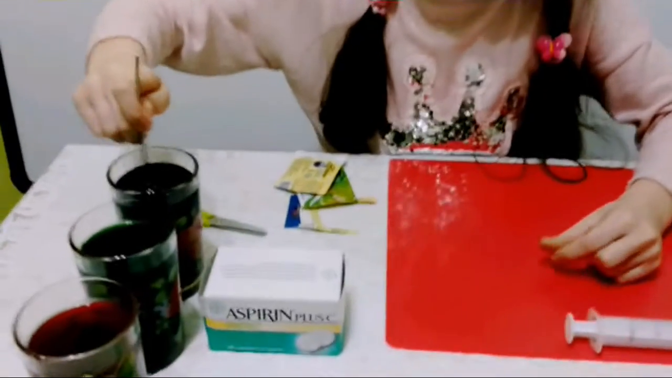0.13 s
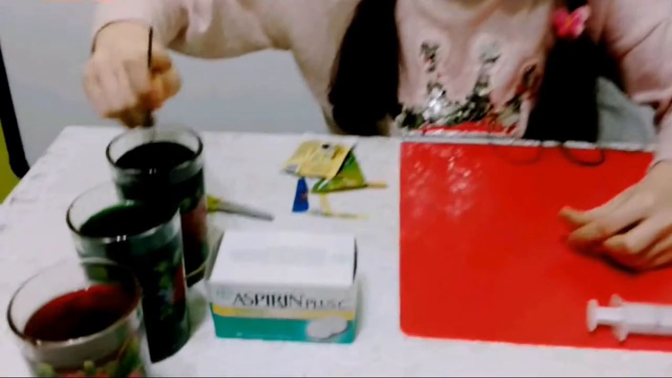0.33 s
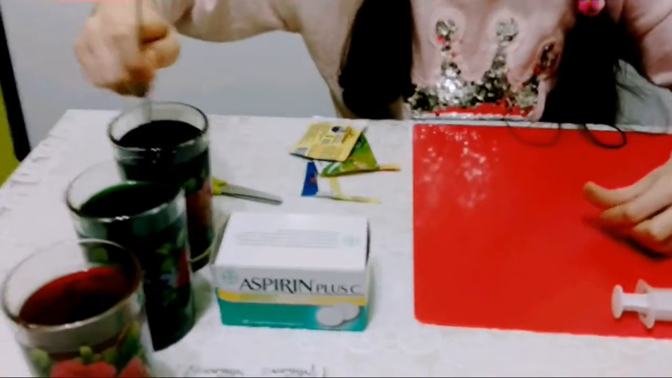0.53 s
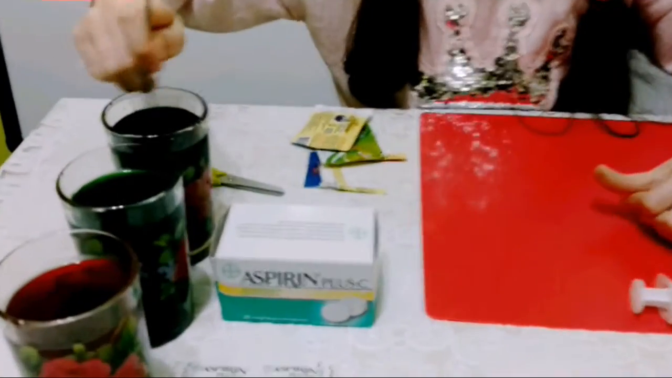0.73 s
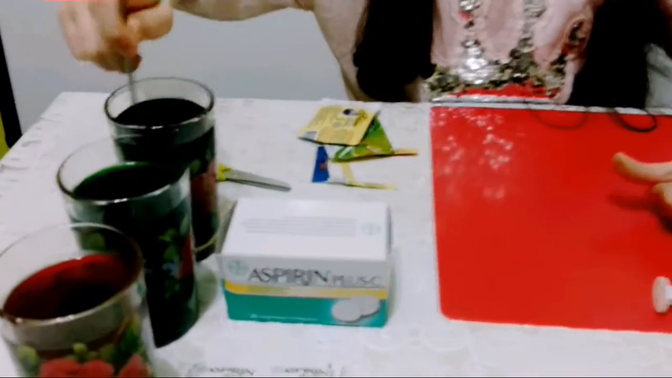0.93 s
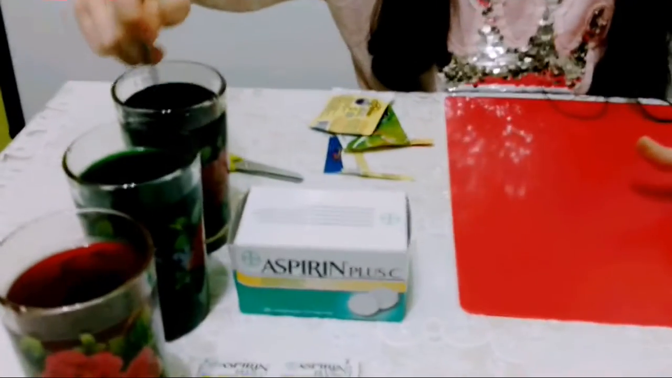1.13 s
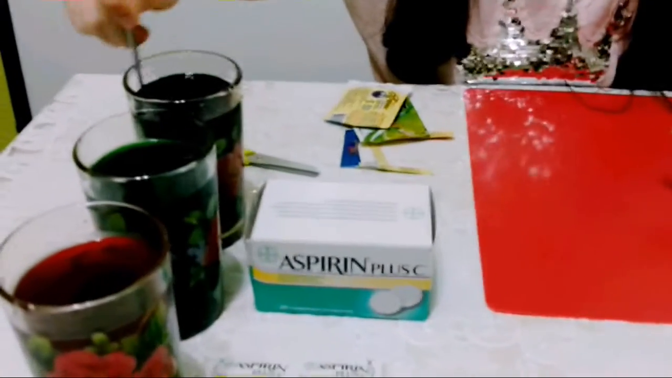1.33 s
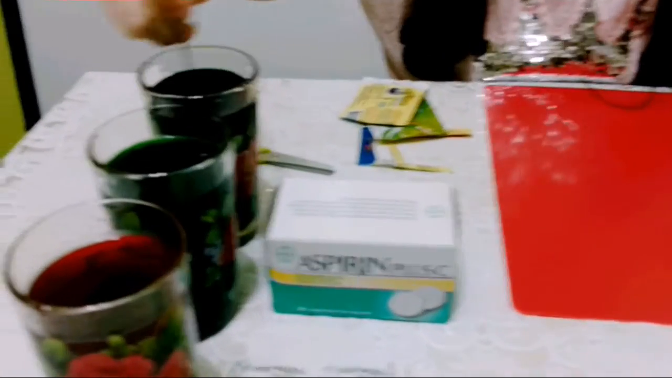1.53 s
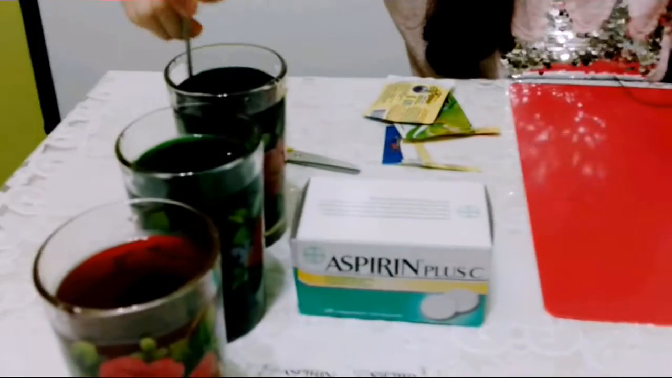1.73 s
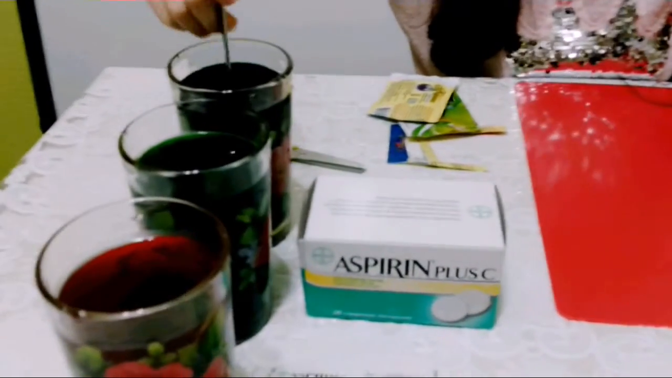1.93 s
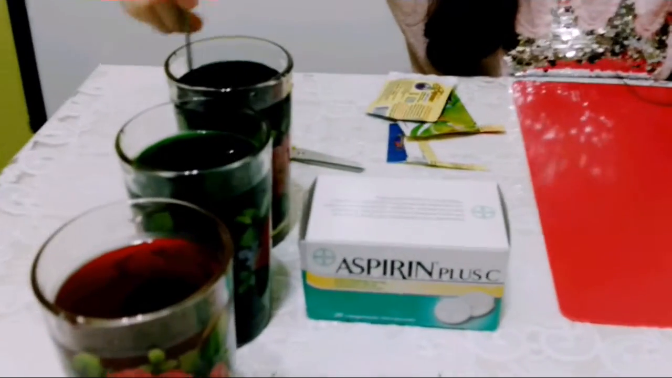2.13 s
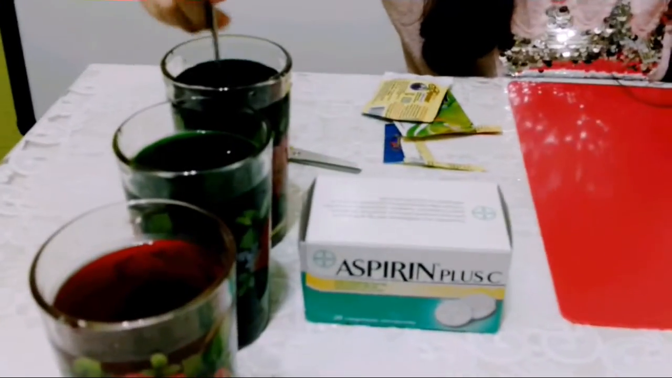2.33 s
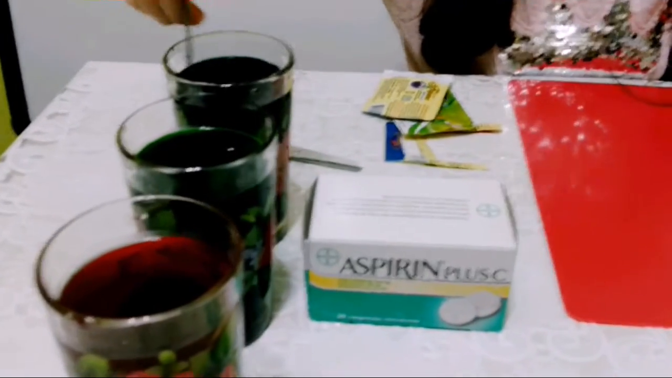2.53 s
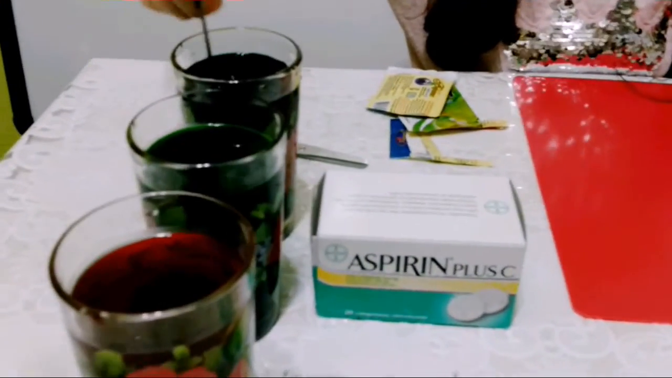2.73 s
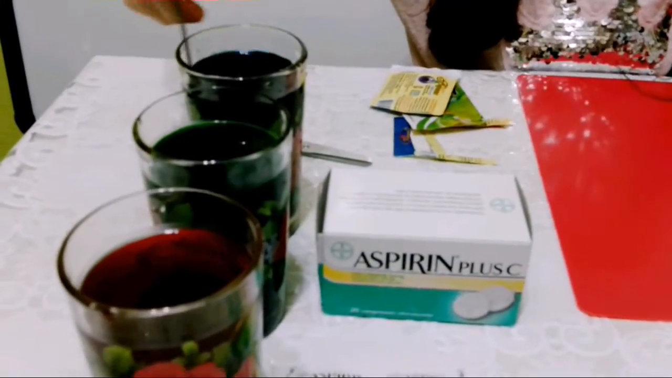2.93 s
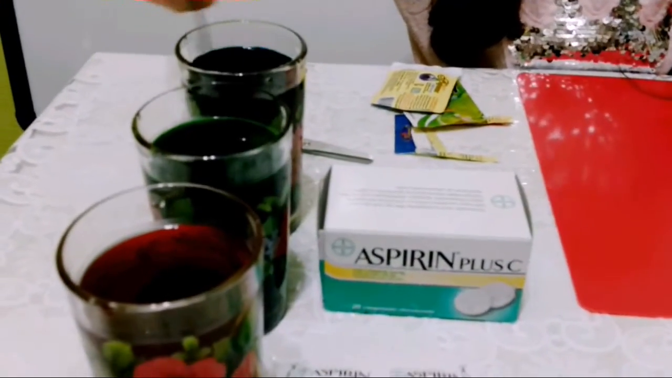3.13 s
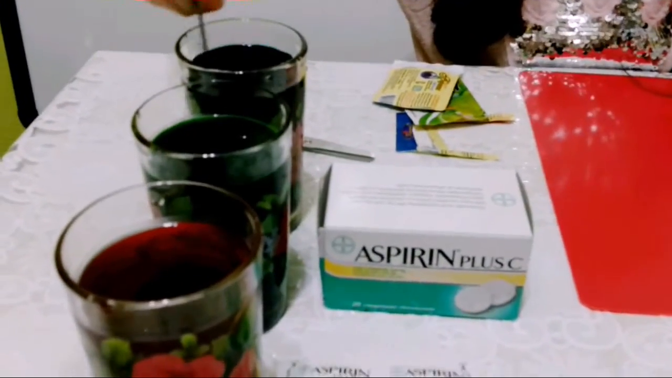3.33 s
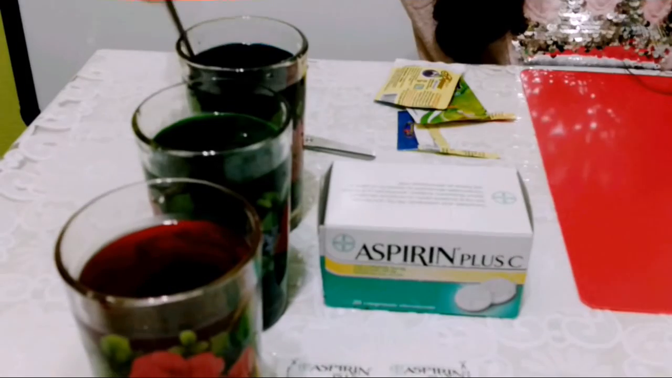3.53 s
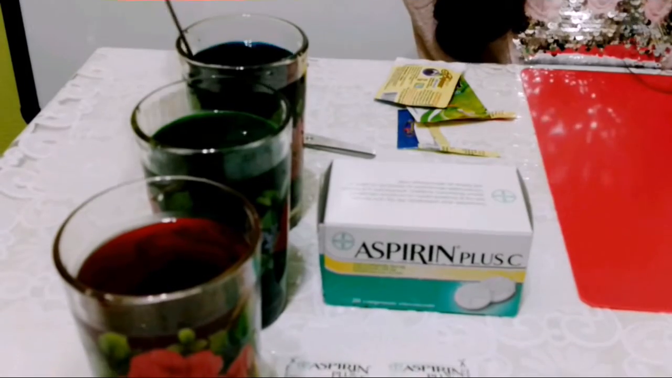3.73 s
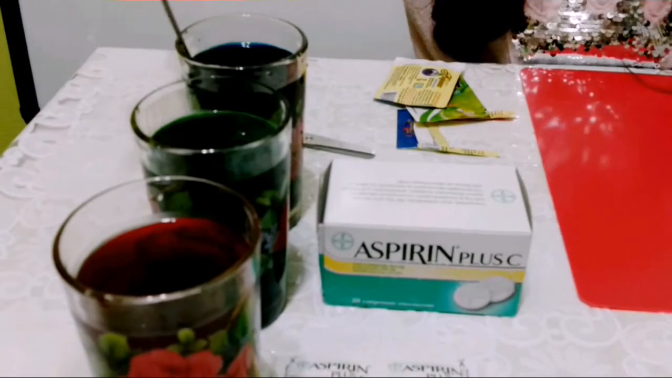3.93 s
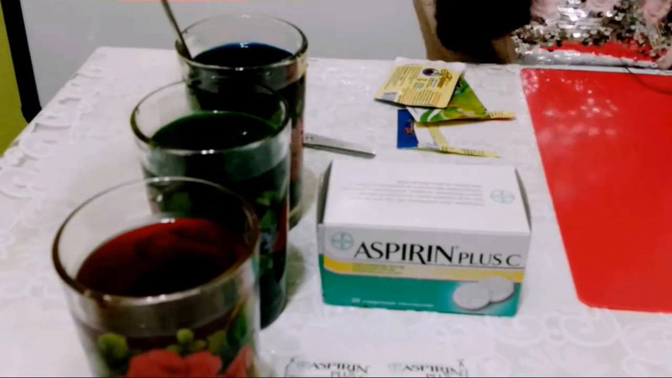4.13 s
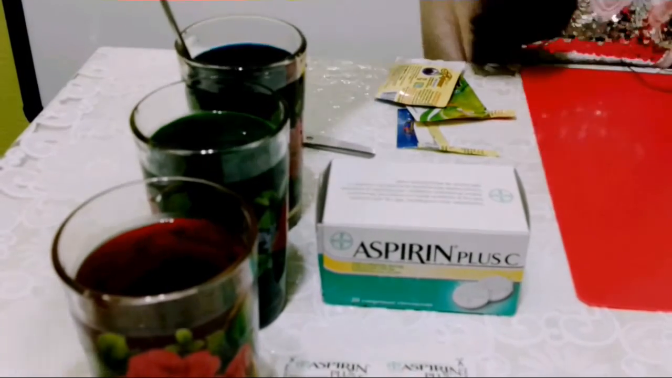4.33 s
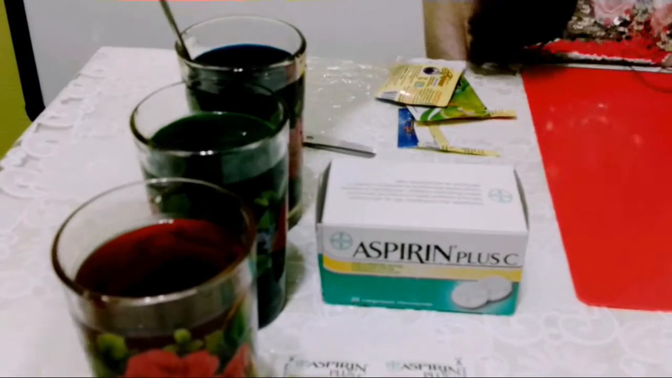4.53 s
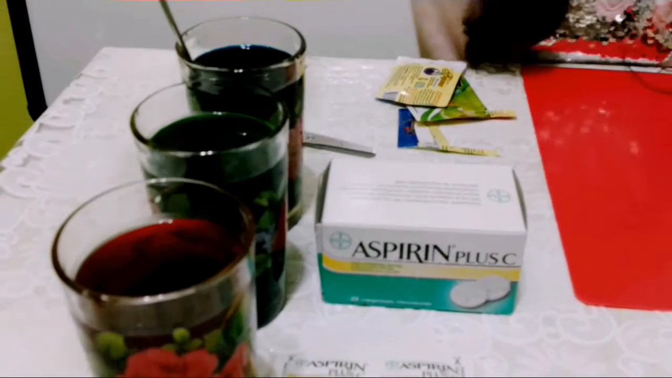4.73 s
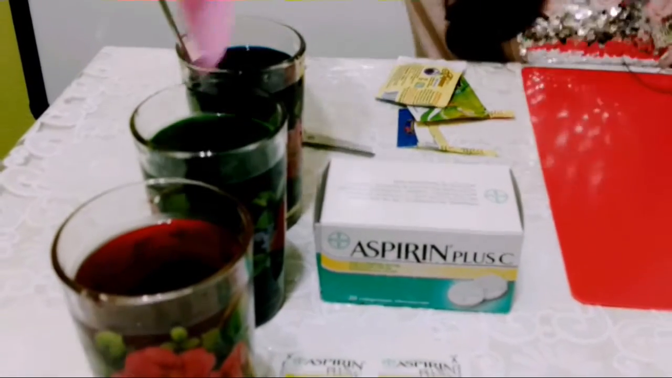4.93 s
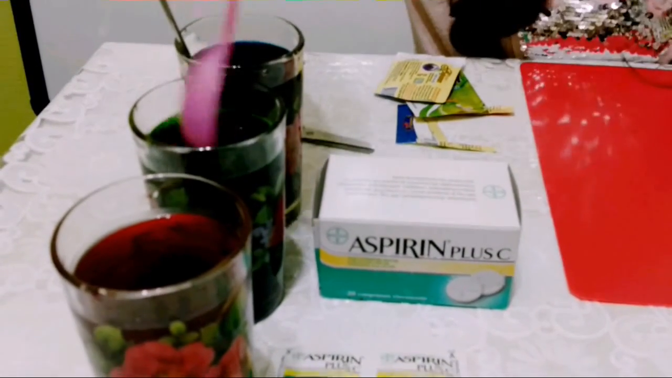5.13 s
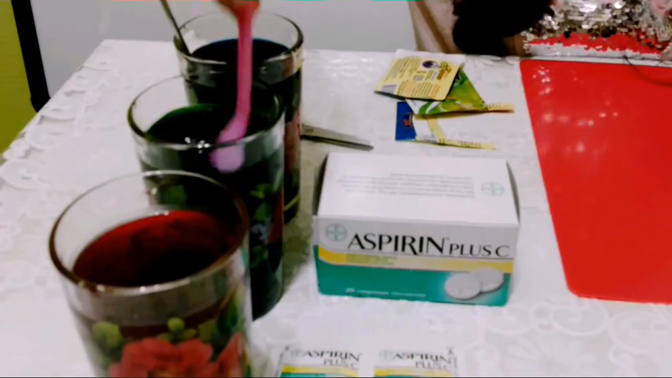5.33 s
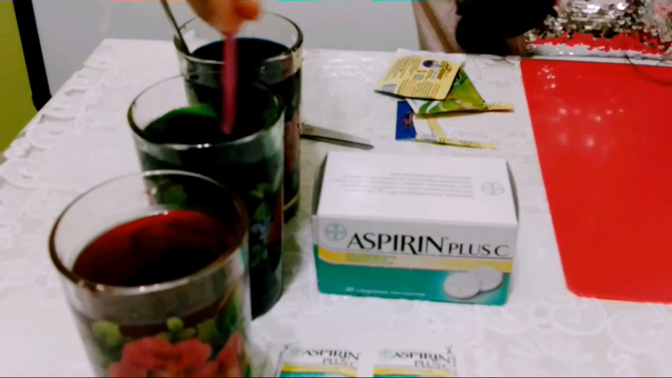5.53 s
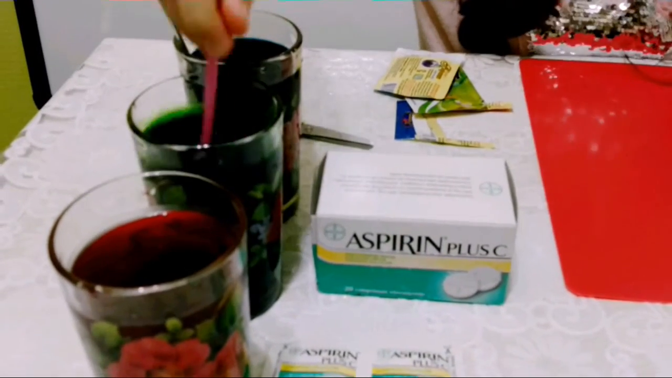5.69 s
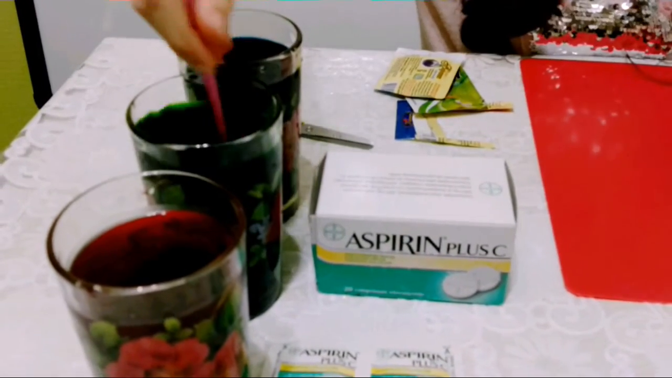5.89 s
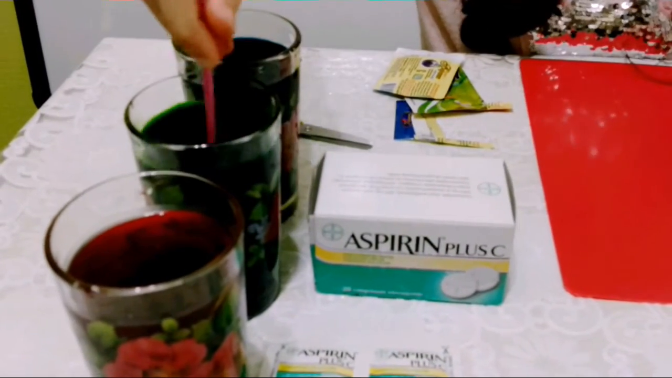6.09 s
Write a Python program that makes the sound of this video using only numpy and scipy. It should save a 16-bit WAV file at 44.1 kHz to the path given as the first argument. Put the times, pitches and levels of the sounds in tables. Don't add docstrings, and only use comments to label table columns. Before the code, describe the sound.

Close on a table in a small room, a steel spoon stirs a full glass with quick uneven bright clinks, light scrapes, soft liquid swirls and low table thumps. It is let go, knocks hard and rattles down. After a near-silent pause, a plastic spoon gives a few softer, duller taps in a second glass. A nearby phone picks up faint hiss and a thin high whine.

```python
import sys
import numpy as np
from scipy import signal
from scipy.fft import rfft, irfft, next_fast_len
from scipy.io import wavfile
from scipy.ndimage import uniform_filter1d

SR = 44100
rng = np.random.default_rng(int(sys.argv[2]) if len(sys.argv) > 2 else 0)


def digitize_waveform(pressure):
    field = np.atleast_2d(pressure).T
    bounded = np.clip(field, -1, 1)
    quanta = np.round(bounded * 32767).astype(np.int16)
    wavfile.write(sys.argv[1], SR, quanta)


def makeup_ratio(level_db):
    decades = np.asarray(level_db, float) / 20
    return 10 ** decades


N = 276012
T = np.arange(N) / SR
STEEL_TIME = T < 5.2

# frequency in Hz, level in dB per Hz.
CONTACT_SPECTRUM = [(530, -47.5), (900, -11), (978, -12), (1710, -8.5), (2120, 0.5), (3060, -10),
                    (3330, -13), (3570, -10.5), (3970, -15), (4640, -12.5), (5740, -4), (8710, -2),
                    (13700, -6.5), (14300, -16.5), (16500, -36.5)]


def colour(x, points):
    hz, db = np.transpose(points)
    size = next_fast_len(x.shape[-1] + 4096)
    f = np.maximum(np.arange(size // 2 + 1) * SR / size, 1)
    gain = makeup_ratio(np.interp(np.log(f), np.log(hz), db))
    return irfft(rfft(x, size) * gain, size)[..., :x.shape[-1]]


def unit(x):
    return x / np.sqrt(np.mean(x ** 2))


def flicker(rate, depth_db):
    hold = int(SR / rate)
    steps = np.repeat(rng.standard_normal(N // hold + 1), hold)
    return makeup_ratio(depth_db * uniform_filter1d(steps, hold)[:N])


def resonate(x, hz, t60):
    decay = np.log(1000) / (max(t60, .002) * SR)
    return signal.lfilter([1], [1, -np.exp(2j * np.pi * hz / SR - decay)], x)


def ring(modes, columns, hits, rub, rise, scatter_db):
    out = np.zeros((2, N))
    at = (hits[:, 0] * SR).astype(int)
    chance = rng.standard_normal((len(at), len(modes), 2))
    for k, (hz, mode_db, t60, lead) in enumerate(modes):
        push = rub * rng.standard_normal(N) * np.sqrt(.7 / SR) / t60 + 0j
        blow = makeup_ratio(hits[:, columns[k]] + scatter_db * chance[:, k, 0])
        np.add.at(push, at, blow * np.exp(1j * chance[:, k, 1]))
        swollen = resonate(push, hz, rise) * np.log(1000) / (rise * SR)
        z = makeup_ratio(mode_db) * resonate(swollen, hz, t60)
        out += np.imag(z * np.exp(.5j * lead * np.array([[1], [-1]])))
    return out


def background():
    # frequency in Hz, level in dB per Hz.
    hiss_spectrum = [(20, 6.5), (60, -7.5), (140, -7), (500, -19), (900, -33.5), (1400, -35), (2200, -36),
                     (4000, -23.5), (7000, -30), (9500, -24.5), (13000, -24), (14500, -34.5)]
    mid, side = colour(rng.standard_normal((2, N)), hiss_spectrum)
    side = colour(side, [(20, -8), (400, -5.5), (1500, -5.5), (20000, -10.5)])
    return makeup_ratio(-66.5) * unit(mid + side * np.array([[1], [-1]])) * flicker(11, 1.2)


def whine():
    # frequency in Hz, level in dB rms.
    tones = [(9538, -69), (11867, -60)]
    return np.array([np.sqrt(2) * makeup_ratio(db) * flicker(3.6, 0.35) * np.sin(2 * np.pi * hz * T)
                     for hz, db in tones])


def room(x):
    t60 = 0.18
    t = T[:SR // 2]
    noise = rng.standard_normal((2, 2, len(t)))
    lingering = unit(colour(noise[0], [(20, -15.5), (1500, -3.5), (4000, -2.5)])) * 1000 ** (-t / t60)
    bright = noise[1] * 1000 ** (-t / (0.88 * t60))
    tail = (0.27 * lingering + bright) * (1 - np.exp(-t / 0.0016))
    return signal.fftconvolve(x, tail / np.sqrt(np.sum(tail ** 2) / 2), axes=1)[:, :N]


def hand():
    # time in seconds, scrape in dB, swirl in dB; first the steel spoon, then the plastic one.
    steel_stir = [(0.0, -60, -63.5), (0.2, -60.5, -87.5), (0.42, -64.5, -64.5), (0.6, -70, -61),
                  (0.89, -66.5, -60), (1.2, -61, -69.5), (1.62, -72, -57), (1.81, -67.5, -67),
                  (1.95, -99, -58.5), (2.16, -57.5, -76), (2.322, -77, -74), (2.65, -56.5, -62),
                  (2.78, -70.5, -79), (3.22, -72, -63), (3.6, -67.5, -73.5), (4.1, -96, -83),
                  (4.4, -75.5, -70), (4.9, -88.5, -94)]
    plastic_stir = [
        (5.36, -92, -94),
        (5.51, -72.5, -68.5),
        (5.65, -73.5, -74),
        (5.86, -69, -72),
        (6.1, -75, -67.5),
        (6.26, -71, -72),
    ]
    s, *columns = np.transpose(steel_stir + plastic_stir)
    return [makeup_ratio(np.interp(T, s, db)) for db in columns]


def slosh(size_db, low_hz, high_hz, cycles, count):
    out, t = np.zeros(N + 4096), T[:4096]
    for when, pitch, size in rng.random((count, 3)):
        hz = low_hz * (high_hz / low_hz) ** pitch
        at = int(when * N)
        swell = hz * t * np.exp(-hz * t / cycles)
        tone = np.sin(2 * np.pi * hz * t * (1 + 0.0033 * hz * t))
        out[at:at + len(t)] += makeup_ratio(-size_db * np.log(size + 0.027)) * swell * tone
    return unit(out[:N])


def swish():
    noise = rng.standard_normal((2, N))
    rush = unit(colour(noise, [(800, -29), (2000, 5.0), (4500, 4), (7000, -11)]))
    return ~STEEL_TIME * flicker(30, 4.0) * rush


def scrape(patchy_db, steps_db):
    out = 0
    grain = colour(rng.standard_normal((2, N)), CONTACT_SPECTRUM) * flicker(40, steps_db)
    for hz in 900 * 2 ** np.arange(0, 4.3, .4):
        band = [(hz / 1.3, -40), (hz / 1.12, 0), (hz * 1.12, 0), (hz * 1.3, -40)]
        out = out + flicker(11, patchy_db) * colour(grain, band)
    return unit(out)


def table_top(swirl):
    # frequency in Hz, level in dB, t60 in seconds, radians by which left leads.
    modes = [(136.55, 2, 0.52, .1), (193.7, -4.5, 0.49, .1), (251.8, -4.5, 0.2, 0.27),
             (309.7, 3.5, 0.26, 0.14), (421.6, -1.5, 0.041, 0.52), (468, -1.5, 0.073, 0.11),
             (586, -18, 0.054, 0.65), (705, -7, 0.054, 0.52), (755.4, -3.5, 0.07, 1),
             (834, -6, 0.048, 0.96), (976, -8, 0.0095, 1)]
    driven_by = [1, 1, 2, 2, 2, 3, 3, 3, 3, 3, 3]
    # time in seconds, boom in dB, hum in dB, knock in dB; steel spoon, then plastic.
    steel_thumps = [(0.063, -80, -66.5, -55.5), (0.248, -76, -84, -53.5), (0.383, -65.5, -63, -62),
                    (0.498, -68, -58, -39.5), (0.672, -66, -68, -60), (0.795, -82, -62, -51.5),
                    (0.842, -85, -60, -46), (1.061, -60, -58, -46), (1.178, -76, -61, -48.5),
                    (1.281, -74, -73, -51), (1.343, -84, -61, -40), (1.721, -78, -69, -52),
                    (1.833, -69, -59, -47.5), (1.997, -75, -85, -55), (2.042, -73, -66, -53),
                    (2.106, -67.5, -53.5, -36), (2.287, -72, -62, -46), (2.43, -68, -66.5, -53),
                    (2.517, -68, -62, -54.5), (2.681, -69, -57, -43.5), (2.859, -77, -67, -51.5),
                    (2.969, -61.5, -56.5, -47), (3.112, -79, -57.5, -46.5), (3.349, -67.5, -58, -42),
                    (3.578, -55, -44.5, -44.5), (3.747, -68.5, -63.5, -69), (3.987, -65.5, -58, -54.5),
                    (4.069, -90, -60, -51), (4.144, -68, -61, -59), (4.203, -87, -59, -63.5)]
    plastic_thumps = [
        (5.448, -72.5, -59, -66),
        (5.563, -82, -67, -62),
        (5.783, -64, -55.5, -75),
        (5.983, -65, -76, -56),
    ]
    rub = 0.18 * swirl * flicker(20, 6.0)
    return ring(modes, driven_by, np.array(steel_thumps + plastic_thumps), rub, 0.0099, 2.74)


def far_glass(steel, swirl):
    # frequency in Hz, level in dB, t60 in seconds, radians by which left leads.
    modes = [(1533, -12, 0.016, 1.65), (2062, -3.5, 0.44, 3.6), (2152, -1.5, 0.011, 3.25),
             (2268, 0.5, 0.014, 2), (2337, 3.5, 0.03, 2.6), (2465, -13, 0.034, 0.79),
             (3195, -10.5, 0.036, 1.5), (4070, -27, 0.099, 2)]
    driven_by = [2, 3, 2, 2, 2, 2, 2, 1]
    return ring(modes, driven_by, steel, .35 * swirl * STEEL_TIME * flicker(45, 4.5), .004, 3.0)


def near_glass(plastic, swirl):
    # frequency in Hz, level in dB, t60 in seconds, radians by which left leads.
    modes = [(590, -13.5, 0.059, 0.44), (1157, 8, 0.089, 3.1), (1217, 1.5, 0.15, 1.3),
             (1400, -3, 0.056, 2.6), (1540, 2.5, 0.023, 0.97), (1790, -6, 0.15, 2.64),
             (2340, 0, 0.015, 1.2), (2440, -3, 0.048, 1.1), (3660, -2, 0.012, 2.6)]
    driven_by = [2, 3, 3, 2, 2, 1, 2, 1, 2]
    return ring(modes, driven_by, plastic, 0.23 * swirl * ~STEEL_TIME * flicker(43, 9.6), 0.0016, 0.72)


def steel_spoon(steel):
    # frequency in Hz, level in dB, t60 in seconds.
    modes = [(2760, -3, 0.024), (3848, -4, 0.047), (5304, -1, 0.085), (5695, -7.5, .05), (6379, -7, 0.068),
             (6900, -9, 0.067)]
    return makeup_ratio(-25) * ring([(*mode, 1.0) for mode in modes], [1] * len(modes), steel, 0, 0.0012, 5.27)


def steel_contacts():
    # time in seconds, tick peak in dB, glass knock in dB, long glass ring in dB, brightest ping in Hz.
    clinks = [(0.2515, -32.5, -56, -46, 10550), (0.501, -50.5, -35.5, -68, 10200),
              (0.6727, -44.5, -47.5, -51, 10670), (0.7918, -62, -45.5, -71, 9600),
              (0.8344, -38.5, -43.5, -40.5, 10200), (1.0604, -39.5, -41, -63, 7960),
              (1.1732, -38.5, -43.5, -54, 7790), (1.3421, -31, -33, -68, 7720),
              (1.3646, -32.5, -58, -70, 9630), (1.767, -30.5, -63, -47, 9480),
              (1.8296, -41, -48, -81, 8200), (1.928, -45.5, -47.5, -54.5, 8050),
              (2.1073, -42, -28.5, -65, 9700), (2.1582, -36.5, -70, -48.5, 9380),
              (2.282, -33, -42.5, -50, 9500), (2.5217, -31, -56, -40.5, 9900),
              (2.6794, -41, -40, -50, 9370), (2.8617, -31, -48, -44, 9840), (2.966, -32.5, -69, -70, 9100),
              (3.003, -34, -53, -61, 7470), (3.1122, -36, -40.5, -63, 9500),
              (3.2619, -37.5, -61, -67, 8980)]
    drop_rattle = [(3.347, -25.5, -40, -57.5, 8390), (3.5522, -38.5, -52, -57, 8070),
                   (3.5785, -20.5, -70, -73, 9070), (3.5852, -32, -35.5, -54, 7350),
                   (3.7506, -34.5, -46, -65, 8890), (3.9605, -46.5, -62, -73, 10000),
                   (3.9783, -35, -42.5, -49, 8870), (3.9937, -40.5, -47.5, -66, 9500),
                   (4.0629, -39.5, -73, -51, 9600), (4.0754, -41, -45.5, -65, 8720),
                   (4.1468, -46.5, -54, -56, 8800), (4.2019, -45, -43.5, -63, 10800),
                   (4.2556, -53.5, -53.5, -63, 9540)]
    # time in seconds, tick peak in dB; the last four sound beside the plastic spoon.
    light_touches = [(0.0697, -49.5), (0.167, -45.5), (0.3074, -55), (0.6088, -63), (0.7126, -49),
                     (0.9644, -51), (1.0065, -46.5), (2.6438, -49), (4.1559, -47), (4.2941, -51.5),
                     (4.7173, -57.5), (6.017, -46), (6.0497, -46.5), (6.111, -55.5), (6.142, -53)]
    grazes = [(s, db, db - 7, db - 21.5, 9500) for s, db in light_touches]
    return np.array(clinks + drop_rattle + grazes)


def plastic_contacts():
    # time in seconds, tick peak in dB, middle ring in dB, low ring in dB, brightest ping in Hz.
    touches = [
        (5.4453, -52.5, -54, -59, 2400),
        (5.5649, -39.5, -35, -65, 2580),
        (5.782, -43.5, -49, -51.5, 1990),
        (5.8011, -62, -55, -59, 1790),
        (5.9844, -39, -48.5, -66, 2440),
    ]
    return np.array(touches)


def ticks(hits, tail_t60, ping_db, ping_t60, chatter_db, tail):
    out, t = np.zeros((2, N + 8192)), T[:8192]
    chance = rng.standard_normal((len(hits), 3, 8, 1))
    chance[:, :2, 0] = 0
    grain = unit(colour(rng.standard_normal((2, N + 8192)), CONTACT_SPECTRUM))
    chatter = np.resize(flicker(400, chatter_db), N + 8192)
    for (s, db, _, _, hz), (spread, size, turn) in zip(hits, chance):
        start = int(s * SR)
        now = slice(start, start + len(t))
        rise = 0.0014 * makeup_ratio(-.6 * (db + 41.5))
        t60 = tail_t60 * makeup_ratio(0.14 * (db + 33))
        crack = grain[:, now] * t / rise * np.exp(-t / rise)
        crack /= np.abs(crack).max(1, keepdims=True)
        after = tail * grain[:, now] * chatter[now] * 1000 ** (-t / max(t60, .005))
        ping_hz = hz * np.exp(0.18 * np.tanh(0.694 * spread))
        pings = makeup_ratio(-7.0 * abs(size)) * np.exp(1j * (2 * np.pi * ping_hz * t + turn))
        pings = pings.sum(0)
        after += makeup_ratio(ping_db) * 1000 ** (-t / ping_t60) * np.array([pings.imag, pings.real])
        out[:, now] += makeup_ratio(db + 1.5) * (crack + (1 - np.exp(-t / rise)) * after)
    return out[:, :N]


def scene():
    scraping, swirling = hand()
    glass_swirl = makeup_ratio(-5) * swirling
    steel, plastic = steel_contacts(), plastic_contacts()
    dry = table_top(swirling)
    dry += makeup_ratio(-6) * swirling * slosh(2.9, 276, 908, 2.0, count=600)
    dry += 0.77 * scraping * swish()
    dry += 1.01 * scraping * scrape(5.3, 6.1)
    dry += far_glass(steel, glass_swirl)
    dry += near_glass(plastic, glass_swirl)
    dry += steel_spoon(steel)
    dry += ticks(steel, tail_t60=0.079, ping_db=-3, ping_t60=0.014, chatter_db=2.0, tail=0.2)
    dry += ticks(plastic, tail_t60=0.027, ping_db=-11.5, ping_t60=0.046, chatter_db=3.0, tail=0.06)
    return dry + makeup_ratio(-1) * room(dry) + background()


def gate(x, duck, unrest_db):
    # frequency in Hz, level in dB under which a band is muted.
    threshold = [(20, -130), (500, -116), (900, -106), (1400, -102.5), (2200, -107), (3200, -100.5),
                 (4700, -98.5), (6500, -109), (9000, -113), (11500, -109), (14200, -106), (14600, -92),
                 (20000, -82)]
    f, _, z = signal.stft(x, SR, nperseg=1536)
    low, middle = np.geomspace(170, 2200, 15), np.arange(2450, 7000, 280)
    edges = np.searchsorted(f, np.r_[0, low, middle, np.arange(7200, 17000, 550)])
    bins = np.diff(np.r_[edges, len(f)])
    power = np.add.reduceat(abs(z) ** 2, edges, axis=1) / bins[:, None]
    band_db = 10 * np.log10(power + 1e-20)
    all_db = 10 * np.log10(power.mean(1, keepdims=True) + 1e-20)
    unrest = rng.standard_normal((1,) + power.shape[1:])
    unrest = uniform_filter1d(unrest, size=6, axis=2)
    unrest += 0.7 * unrest[:, :1]
    hz, db = np.transpose(threshold)
    limit_db = np.interp(np.log(f[edges] + 20), np.log(hz), db)[:, None]
    limit_db = limit_db + duck * (all_db + 89.5) + unrest_db * unrest
    keep = 1 / (1 + np.exp(np.clip(limit_db - band_db, -7, 7)))
    return signal.istft(z * np.repeat(keep, bins, axis=1), SR, nperseg=1536)[1][:, :N]


def ports(dry):
    # frequency in Hz, left minus right in dB.
    difference = [(60, 1), (200, 2.5), (700, 1.5), (1300, 3), (2400, -2), (4400, 1), (6300, 3), (7500, 8),
                  (9000, 13), (10300, 8), (11500, 1), (15000, -1)]
    hz, db = np.transpose(difference)
    return np.array([colour(dry[0], np.c_[hz, db / 2]), colour(dry[1], np.c_[hz, -db / 2])])


def low_pass(x):
    return signal.sosfilt(signal.butter(12, 15900, fs=SR, output="sos"), x)


def record(dry):
    sound = gate(ports(dry), duck=.86, unrest_db=13.0)
    return low_pass(sound + whine())


dry = scene()
out = record(dry)
digitize_waveform(out)
```